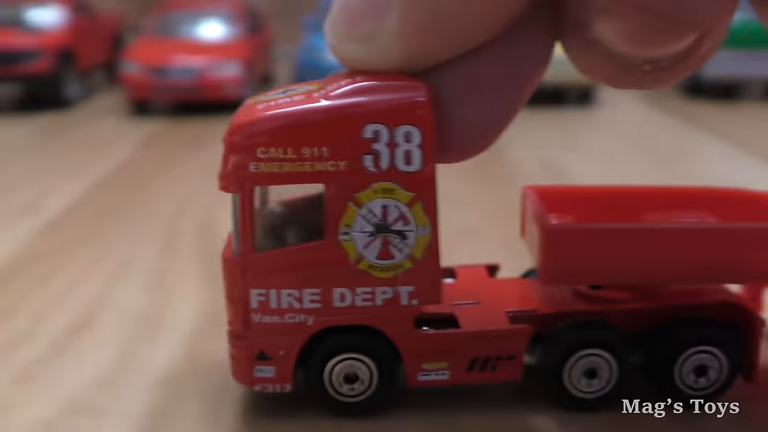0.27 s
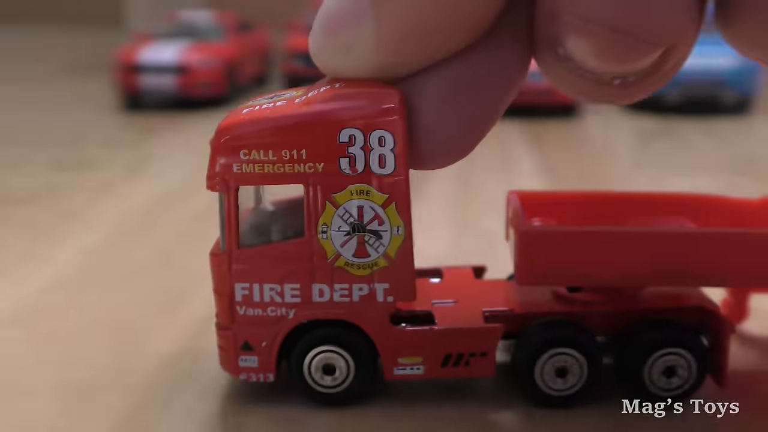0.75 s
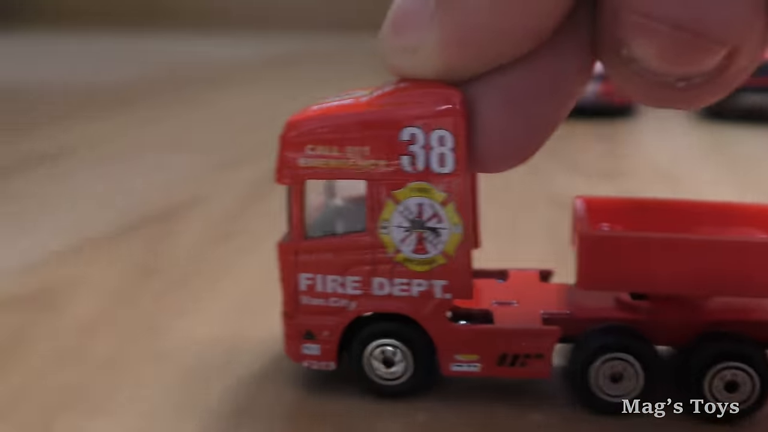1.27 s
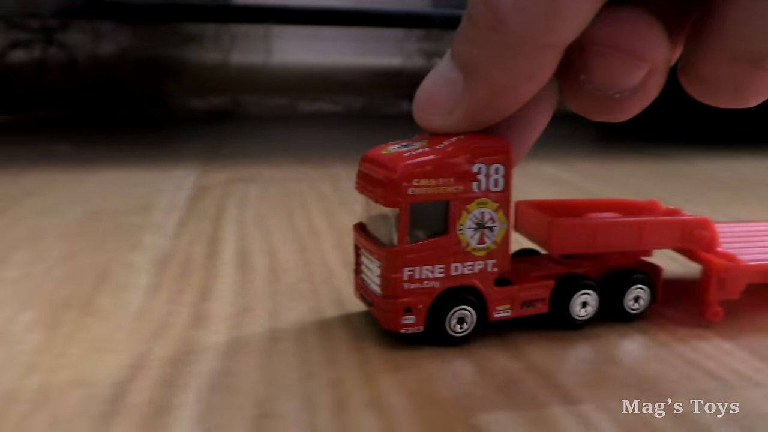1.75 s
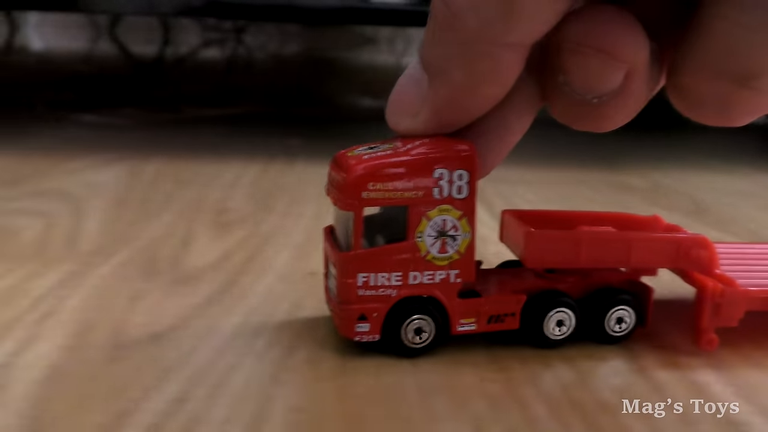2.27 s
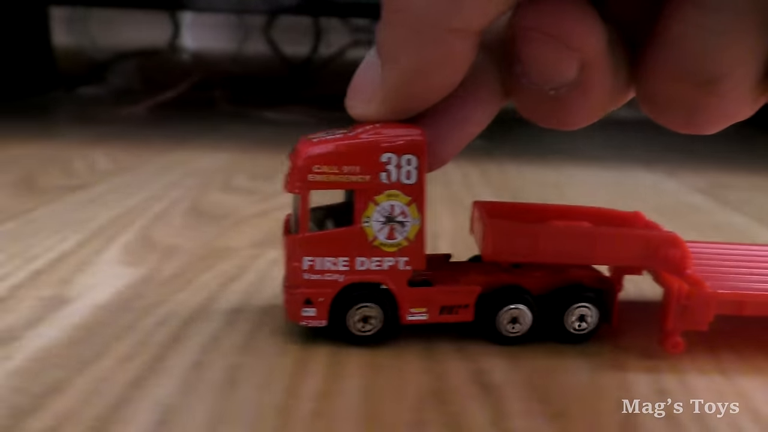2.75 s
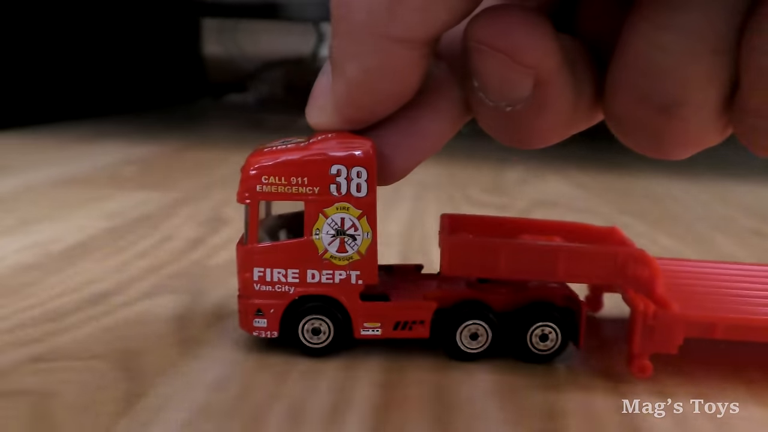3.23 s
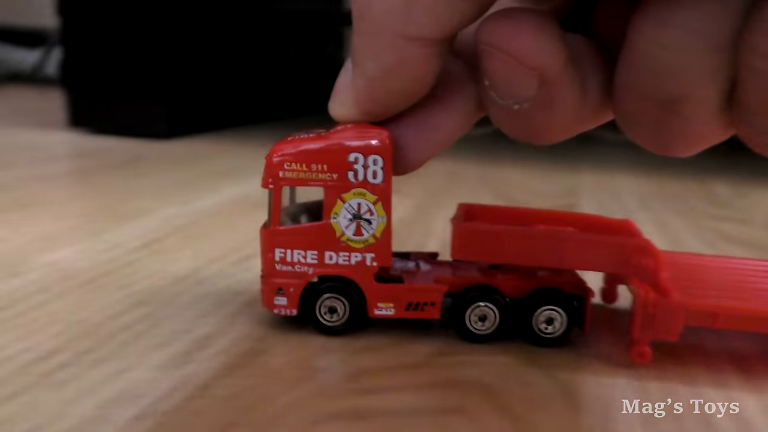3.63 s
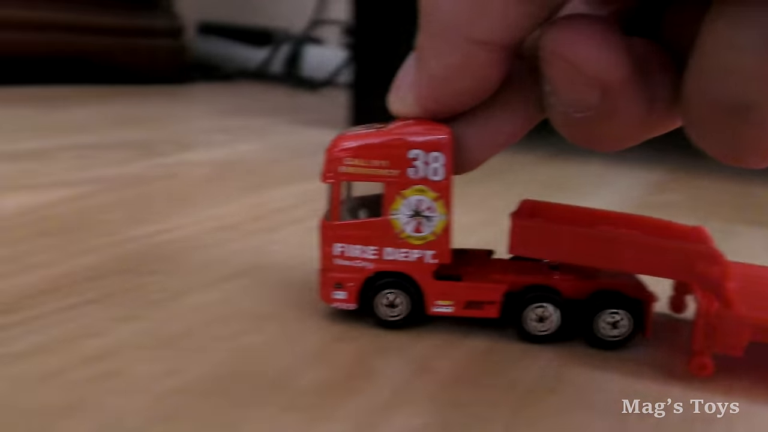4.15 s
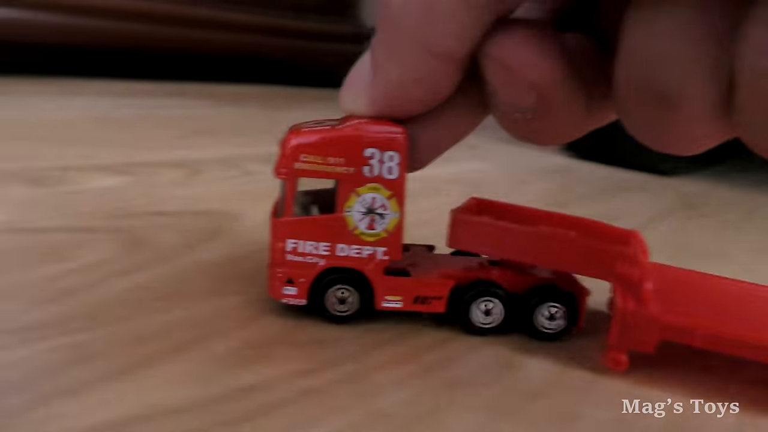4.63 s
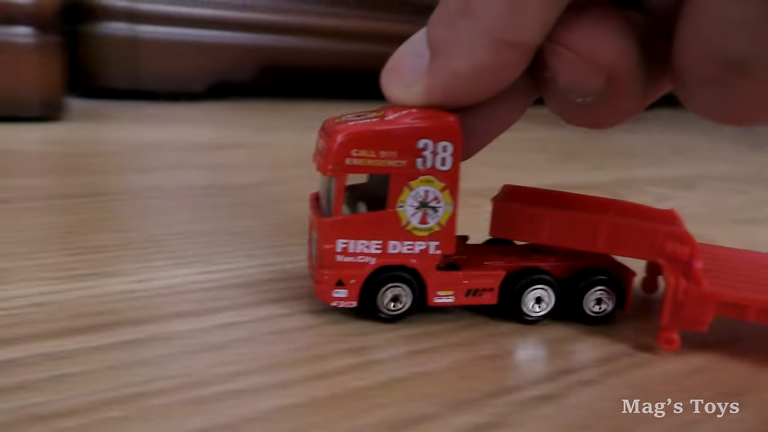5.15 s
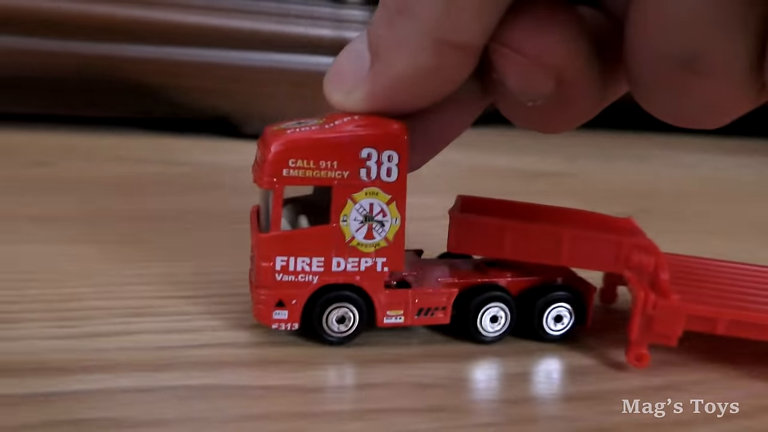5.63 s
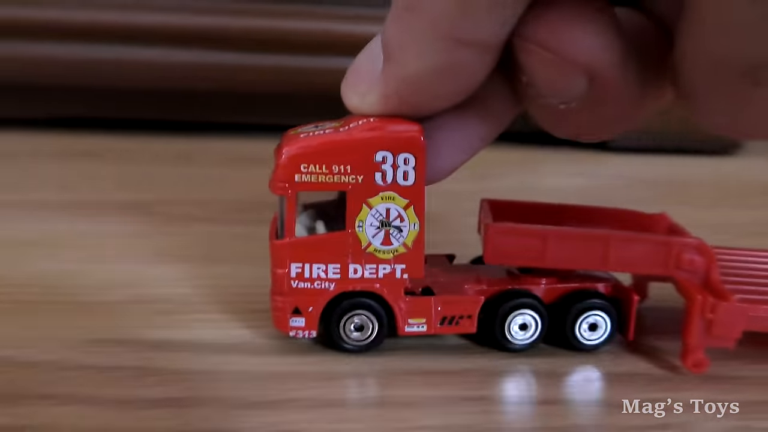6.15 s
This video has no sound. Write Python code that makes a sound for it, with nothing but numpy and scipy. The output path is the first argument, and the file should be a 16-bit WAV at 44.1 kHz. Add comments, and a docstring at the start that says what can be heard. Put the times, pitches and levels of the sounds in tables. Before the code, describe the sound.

From 0 s a small die-cast toy truck with a plastic trailer is already rolling over a wooden floor, close to a stereo microphone. A low, lumpy board rumble lies under a dry, gritty wheel grind. Loose axles rattle in brief irregular bursts, several each second, with sharp bright metallic-plastic clicks, each a tiny flurry of touches with a small wooden thump. From about 0.5 to 1.6 s the clicks are strong and crowded, peaking near 1.5 s. Around 1.6 s the tone changes as the truck seems slightly farther off. Snappy knocks continue near 2.2 s and 3 s; around 4 to 4.7 s some are lower and duller. From 5 to 6 s quick chatter and bright clicks return over surges of rumble. Rolling continues to the end at about 6.4 s, without stopping. Reflections are short, with only a faint low room hum behind.

```python
"""Toy truck on a wooden floor

A hand pushes a small die-cast toy truck with a plastic trailer, close to a two-port microphone.
The boards rumble under the wheels as filtered noise; the wheels grind over the grain and loose axles
rattle in bursts, both as random taps that ring the hollow body. Sharper knocks are flurries of touches
on the same body plus a low thump. Near echoes and a faint low room hum lie around them.
"""
import sys
import numpy as np
from scipy import signal
from scipy.fft import rfft, irfft, next_fast_len
from scipy.io import wavfile
from scipy.ndimage import uniform_filter1d

SR = 44100
rng = np.random.default_rng(int(sys.argv[2]) if len(sys.argv) > 2 else 0)


def dump(signal):
    """Clip the signal to [-1, 1] and save it as 16-bit WAV at the path in sys.argv[1]."""
    limited = np.clip(np.atleast_2d(signal).T, -1, 1)
    pcm = np.round(limited * 32767).astype(np.int16)
    wavfile.write(sys.argv[1], SR, pcm)


def gain_from_decibels(decibels):
    """Convert decibel values to linear amplitude factors."""
    exponent = np.asarray(decibels, float) / 20
    return 10 ** exponent


N = 281799

# All levels in the tables are relative: later stages add their own gain.
# Slow rolling levels: time_s, board_rumble_db, wheel_grind_db, axle_rattle_between_bursts_db
ROLLING_LEVELS = [(0, -34, -37.5, -44), (.09, -33, -34, -67), (.2, -31, -31, -42.5), (.4, -33, -30, -43),
                  (.6, -30, -32.5, -40.5), (1., -31, -28, -38), (1.5, -34.5, -32, -38.5),
                  (1.9, -34, -34.5, -50), (2.3, -33, -32.5, -39), (2.75, -33.5, -35, -40.5),
                  (3.3, -32.5, -34.5, -40.5), (3.7, -28.5, -31.5, -37.5), (4.0, -32.5, -31.5, -39),
                  (4.4, -30.5, -34.5, -40), (4.95, -33.5, -33.5, -44.5), (5.3, -27, -31.5, -36.5),
                  (5.65, -31, -32.5, -41.5), (5.85, -28, -31.5, -47), (5.97, -31, -29.5, -41),
                  (6.1, -28.5, -34, -37.5), (6.22, -32.5, -33, -41), (6.39, -32, -32, -41)]
# Sharper knocks of an axle in its slot: start_s, peak_db, favoured_pitch_hz, brightness_db_per_octave
AXLE_KNOCKS = [(0.0354, -12, 3170, 12), (0.1093, -12, 4070, -1), (0.118, -16, 3950, -1),
               (0.135, -17, 5830, 3), (0.1601, -12, 5650, 6), (0.1996, -6, 3800, 16),
               (0.3144, -6, 4000, 17), (0.3403, -10, 3960, 1), (0.3678, -13, 3700, 0.1),
               (0.387, -15, 3800, 0.1), (0.5, -9, 3700, 6), (0.516, -17, 4000, 5), (0.527, -10, 4000, 4),
               (0.5473, -5.5, 4070, 8), (0.5815, -9, 3640, 5), (0.6456, -8, 3800, -11),
               (0.698, -6, 3800, 0), (0.7154, -4.5, 3370, 12), (0.7405, -7.5, 3630, 13),
               (0.7978, -11, 3770, -2), (0.8544, -8, 3740, 8), (0.9267, -5.5, 3580, -5),
               (0.9682, -4.5, 4070, -19), (1.018, -9.5, 3990, -2), (1.054, -4, 3800, 16),
               (1.138, -17, 4200, 0), (1.1987, -3.5, 4240, 16), (1.271, -13, 3660, -12),
               (1.294, -24, 3290, 9), (1.3443, -25, 4020, 3), (1.365, -10, 3420, 1), (1.4564, -5, 3400, 16),
               (1.4675, -3.5, 3460, 20), (1.52, -18, 3500, 8), (1.5383, -1, 3300, 11), (1.558, -9, 3400, 8),
               (1.572, -16, 3500, 5), (1.613, -8, 8500, 0), (1.6501, -8, 3830, 22), (1.819, -16, 4100, 0.1),
               (1.83, -8.5, 4060, 9), (1.942, -11.5, 4200, -3), (2.006, -7, 4100, 1),
               (2.022, -14, 4000, 20), (2.1694, -10, 3370, -3), (2.195, -12, 4010, -6),
               (2.2147, -3, 3960, 0), (2.246, -9, 3300, -9), (2.276, -2.5, 3260, 17),
               (2.386, -8.5, 3740, 16), (2.4687, -14, 3990, 0.1), (2.531, -20, 3580, 3),
               (2.5825, -8, 3800, 12), (2.68, -13, 4200, 3), (2.7733, -7, 3700, 7), (2.9374, -13, 3230, -4),
               (2.98, -6, 3400, 19), (3.069, -6, 3830, 13), (3.1889, -14, 3470, 9), (3.3435, -14, 4060, 7),
               (3.3745, -11, 3420, 0), (3.4248, -9.5, 3550, -5), (3.434, -9, 2580, -8),
               (3.432, -5, 8900, 9), (3.5763, -12, 4020, 1), (3.623, -11, 3450, -4),
               (3.669, -6.5, 3350, 13.5), (3.738, -12, 3440, -6), (3.779, -11, 1850, -10),
               (3.869, -21, 8900, 2), (4.005, -6.5, 4700, 11), (4.019, -21, 3860, 11),
               (4.048, -23, 3240, 14), (4.073, -20, 3140, 10), (4.0826, -8, 3000, 15),
               (4.119, -17, 2650, -3), (4.164, -8, 3400, 12), (4.2492, -16, 3900, 24),
               (4.282, -12, 2520, 1), (4.3203, -14, 3990, 14), (4.4832, -12.5, 1820, 10),
               (4.569, -8, 2560, 9), (4.598, -5, 1860, 7), (4.628, -12, 2470, 12), (4.7681, -18, 2900, 8),
               (4.84, -13, 3400, 5), (4.9412, -9, 3550, 4), (5.03, -13, 2030, -7), (5.0954, -6, 3300, 18),
               (5.14, -13, 3320, -5), (5.259, -7, 3330, 21), (5.407, -5, 4160, 18), (5.431, -12, 3840, 2),
               (5.447, -7, 8900, 8), (5.5407, -18, 3820, 5), (5.642, -16, 2580, -2),
               (5.7413, -5.5, 3620, 16.5), (5.8184, -14, 2770, 1), (5.8977, -11, 3270, -4),
               (5.945, -9, 8900, 17), (6.027, -15, 1910, 12), (6.062, -6, 2580, 9),
               (6.1756, -8.5, 2020, -2), (6.1973, -21, 3900, 12), (6.353, -13, 3400, 12)]
# Spectrum of the floorboards: pitch_hz, density_db_per_hz
BOARD_SPECTRUM = [(65, -50), (110, -22.5), (145, -17.5), (165, -14.5), (190, -9), (231, -3), (340, 1.5),
                  (445, -3.5), (600, -22), (693, -19.5), (816, -26.5), (1000, -25), (1200, -25),
                  (1430, -20), (2420, -120)]
# Body and trailer resonances: pitch_hz, unloaded_t60_s, level_db,
# scatter_share (of the pitch scatter between contact points: low for the stiff metal parts)
BODY_MODES = [(1065, 0.01, -37, 1), (1310, 0.0091, -24, 1), (1520, 0.012, -27, .8), (1810, 0.019, -6, 0.73),
              (2005, 0.025, -4.5, 0.32), (2220, 0.025, -11, 1), (2580, 0.033, 3, 0.18),
              (2852, 0.025, 1, 0.84), (3290, 0.042, 5.5, 0.32), (3570, 0.011, 10.5, 0.92),
              (3952, 0.014, 10.5, 0.68), (4255, 0.013, 3, .8), (4670, 0.024, -2, 0.78),
              (5016, 0.047, 0.5, .15), (5167, 0.019, -0.5, .5), (5560, 0.015, 0.5, 0.87),
              (5800, 0.024, -5, .6), (6000, 0.038, -6.5, .7), (6500, 0.07, -12.5, 0.081),
              (6780, 0.02, -7.5, .7), (7670, 0.03, -10.5, 0.34), (8300, 0.021, -9.5, .6),
              (8873, 0.023, -4.5, .15), (9230, 0.012, -7.5, 0.61), (9700, 0.016, -11.5, 1),
              (10500, 0.015, -11, 1), (11080, 0.015, -19, 1), (12900, 0.022, -22, 1),
              (12640, 0.025, -16, 1), (14200, 0.008, -28, 1), (14700, .015, -26, .5), (15600, .01, -24, 1)]
# Tone of the wheel grind: pitch_hz, gain_db
GRIND_SPECTRUM = [(500, -10.5), (1000, -3), (2000, 3), (4000, -7), (6000, -11), (9000, -18), (15000, -26)]
# Tone of the axle rattle: pitch_hz, gain_db
RATTLE_SPECTRUM = [(700, -37), (1500, -1), (3000, -2), (5000, -2.5), (8000, 4.5), (12000, 3), (16000, -10)]
# Bursts of chatter when a wheel's uneven spot comes round: start_s, length_s, level_db
CHATTER_BURSTS = [(0.09, 0.015, -42), (0.107, 0.13, -36), (0.298, 0.086, -38), (0.413, 0.066, -48),
                  (0.481, 0.037, -32.5), (0.555, 0.04, -47), (0.677, 0.057, -39), (0.77, 0.044, -43),
                  (0.81, 0.041, -33.5), (0.96, 0.11, -32.5), (1.108, 0.1, -35), (1.268, 0.035, -47),
                  (1.334, 0.089, -33), (1.448, 0.17, -35), (1.642, 0.077, -35.5), (1.748, 0.041, -37.5),
                  (1.804, 0.017, -33.5), (1.863, 0.06, -59), (1.931, 0.015, -36.5), (2.001, 0.043, -38),
                  (2.062, 0.1, -51), (2.189, 0.14, -34), (2.387, 0.042, -31.5), (2.464, 0.03, -31.5),
                  (2.566, 0.044, -35), (2.638, 0.09, -33), (2.766, 0.051, -34), (2.833, 0.066, -36.5),
                  (2.945, 0.13, -33), (3.126, 0.059, -36), (3.175, 0.038, -33), (3.23, 0.042, -34),
                  (3.37, 0.02, -34), (3.443, 0.073, -33.5), (3.543, 0.16, -37), (3.997, 0.023, -36.5),
                  (4.07, 0.15, -39.5), (4.2, 0.021, -33.5), (4.24, 0.2, -46), (4.381, 0.063, -36.5),
                  (4.477, 0.017, -33.5), (4.583, 0.057, -39), (4.618, 0.052, -34), (4.692, 0.07, -45),
                  (4.775, 0.032, -33.5), (4.817, 0.017, -31), (4.885, 0.084, -52), (4.968, 0.027, -38),
                  (5.028, 0.013, -34.5), (5.075, 0.016, -41), (5.137, 0.15, -32), (5.348, 0.019, -32),
                  (5.41, 0.032, -36.5), (5.472, 0.026, -33), (5.519, 0.059, -32.5), (5.634, 0.023, -30.5),
                  (5.688, 0.036, -38.5), (5.717, 0.031, -30.5), (5.767, 0.026, -36), (5.823, 0.036, -32.5),
                  (5.882, 0.048, -31), (5.934, 0.034, -33.5), (6.034, 0.067, -36), (6.189, 0.07, -33.5),
                  (6.277, 0.042, -33.5), (6.31, 0.068, -43)]
# Brief dips of grind and rattle: centre_s, length_s (centre to 1/e of the dip in dB), depth_db
BRIEF_LULLS = [(1.98, 0.018, -3), (2.766, 0.0051, -9), (3.31, 0.0077, -10), (3.366, 0.011, -3.5),
               (3.502, 0.022, -5.5), (3.977, 0.014, -7), (4.039, 0.016, -6), (4.53, 0.036, -3),
               (4.745, 0.039, -4.5), (4.866, 0.015, -4), (5.012, 0.0086, -4), (5.876, 0.0069, -6),
               (5.968, 0.009, -8)]
# Level of each touch in a knock's flurry: level_db
BOUNCE_LEVELS_DB = [-1.5, 1, -4, -7.5, -5]
# Truck seen from the microphone, which is set farther back at 1.6 s: time_s, nearness (0-1), boom_db,
# scrape_db, rumble_top_edge_db, hiss_db, low_band_db, mid_band_db, left_minus_right_db
TRUCK_POSE = [(.1, 0.72, 6.5, 6, 3, 0.5, -2, -1, -1.2), (.5, 0.98, 1.5, 0, 1.5, -1, 0.5, -0.4, -0.9),
              (.9, 1, 4, -1, 2.5, -2.5, 0, -0.17, -0.7), (1.25, 1, 2.5, -1, 6.5, -2.5, -1.5, 0.93, -1.5),
              (1.6, 0.8, 3, -3, 4.5, 0, 1, 1.8, -2.5), (1.63, 0, 5, 2, 5.5, -1, 1, -1.5, -0.5),
              (2., 0.26, 3, 4.5, 2, 3, 1.5, -1.4, 0.7), (2.3, 0.02, -1, -2.5, 1, -3.5, -2.5, -0.78, -0.5),
              (2.65, 0.7, 2.5, -3, 1, -4, 2.5, -0.67, 0), (3., 0.25, 5, -3, -0.5, -1, -2.5, 0.93, 0),
              (3.3, 0.3, 4, -2.5, -1, -4.5, 0.5, 1.9, -0.2), (3.6, 0.45, 0, -1, -2, -2, -2.5, 1.9, -1),
              (3.95, 0.37, 1, 0, -2.5, -2, -2.5, 2.1, -0.8), (4.3, 0.23, 1.5, -2, -3, -2.5, -1, 1.8, -1.5),
              (4.7, 0, -0.5, -1, 1, -4, -1, 0.67, -1.5), (5.1, 0.3, -6, -5, 0.5, -1.5, -4.5, 1.1, -1.5),
              (5.35, 0.2, -6, -4, 0, -2.5, -4.5, 1.5, -1.5), (5.6, 0.32, -2.5, -4, 1.5, -2, -1.5, 2, -1),
              (5.95, 0.56, -1, -2, 4, 0.5, -2.5, 1.5, -0.5), (6.3, 0.5, 3.5, -4, 8, -2, 0, 0.5, -0.5)]
# Colour regions that change with nearness: centre_hz, width_log_hz, far_db, near_db
COLOUR_REGIONS = [(121, 0.57, 1, -2), (296, 0.2, -4, 1), (430, 0.12, 2.5, -3.5), (510, 0.071, 3, -4),
                  (618, 0.22, -2, 1.5), (780, 0.12, -1.5, 1), (920, 0.62, -1, -1.5), (1690, 0.23, 6, -0.5),
                  (2560, 0.11, 0.5, -5.5), (3800, 0.096, -1, 1), (7000, 0.059, 0, -1),
                  (8900, 0.03, -0.5, -2), (9350, 0.1, -0.5, 0.5), (12900, 0.38, 3.5, 1)]
# Strength of the passing patches of colour: pitch_hz, spread_db
PATCH_SPREAD = [(800, 0.35), (2000, 0.82), (3500, 1.12), (5000, 0.86), (9000, 1.9)]
# Share of power that both ports hear alike: pitch_hz, likeness (0-1)
PORT_LIKENESS = [(60, 0.16), (130, 0.97), (290, 1), (640, 0.88), (1000, 0.72), (1800, 0.8), (3500, 0.94),
                 (6820, 0.91), (10000, 1), (15000, 0.92)]
# Phase by which the left port leads: pitch_hz, lead_rad
PORT_LEAD = [(0, -0.14), (860, -0.2), (1460, 0.71), (1810, 0.036), (3010, -0.88), (3530, -0.69),
             (4050, -0.63), (5170, 0.52), (6370, -0.023), (11700, -0.14), (14400, -0.17), (14700, -0.6),
             (15900, -0.14)]
# Level difference between the ports: pitch_hz, left_minus_right_db
PORT_LEAN = [(60, 9), (110, 0.5), (200, 0.5), (380, -1.5), (700, -3), (1290, -4.5), (2380, -5),
             (4400, -4.5), (8120, 0), (15000, -5)]
# Spectrum of the room hum: pitch_hz, density_db_per_hz
ROOM_SPECTRUM = [(20, -16), (60, -2), (110, -9), (200, -5), (1000, -18)]


def rumble():
    """The boards answer the bumps of the grain with a broad low hump of noise, in random lumps."""
    lump_db, lump_s = 1, 0.033
    low = coloured(rng.standard_normal(N), BOARD_SPECTRUM)
    wander = evened(uniform_filter1d(rng.standard_normal(N), round(lump_s * SR)))
    return gain_from_decibels(lump_db * wander) * rolling(column=1) * low / band_rms(low, 150, 550)


def grind():
    """Dense small bumps under the wheels ring the lower body modes."""
    follow = 0.15  # dB of grind for each dB that a burst lifts the rattle
    burst_lift = 1 + bursts() / rolling(column=3) ** 2  # as a power ratio
    level = rolling(column=2) * burst_lift ** (follow / 2) * lulls()
    bumps = contacts(per_s=3400, size_db=2.25, jolts_per_s=130, jolt_db=-5.5, settle_s=0.004,
                     together=0.23, count=24, home_hz=(1500, 4200),
                     spread_db=5.5, crack_db=12, crack_s=0.014, favour_db=7.5, reach=0.32,
                     ring_share=0.58, scatter=0.032)
    sound = coloured(sounded(*bumps, level), GRIND_SPECTRUM)
    return gain_from_decibels(-3.0) * sound / band_rms(sound, 1140, 5600) * np.sqrt(np.mean(level ** 2))


def rattle():
    """Loose axles chatter in their slots, brighter and more jolted than the grind."""
    level = np.sqrt(rolling(column=3) ** 2 + bursts()) * lulls()
    ticks = contacts(per_s=2200, size_db=1.16, jolts_per_s=70, jolt_db=3.5, settle_s=0.0026,
                     together=0.17, count=24, home_hz=(5000, 14500),
                     spread_db=6.5, crack_db=-1.5, crack_s=0.02, favour_db=11, reach=0.16,
                     ring_share=0.74, scatter=0.02)
    sound = coloured(sounded(*ticks, level), RATTLE_SPECTRUM)
    return gain_from_decibels(-2.0) * sound / band_rms(sound, 5730, 16000) * np.sqrt(np.mean(level ** 2))


def knocks():
    """Short flurries of touches ring the whole body, leaning slightly right by varying amounts."""
    far_lean_db, near_lean_db, lean_scatter_db = -1, -2, -0.5  # left minus right
    out = np.zeros((2, N + 4096))
    times, near, *_ = np.transpose(TRUCK_POSE)
    for start_s, peak_db, favour_hz, bright_db in AXLE_KNOCKS:
        touches = flurry(favour_hz, bright_db)
        lean_db = np.interp(np.interp(start_s, times, near), [0, 1], (far_lean_db, near_lean_db))
        lean_db = lean_db + lean_scatter_db * rng.standard_normal()
        side = gain_from_decibels(np.array([[.5], [-.5]]) * lean_db)
        knock = touches / abs(touches).max() + board_thump(len(touches))
        start = round(start_s * SR)
        out[:, start:start + len(knock)] += gain_from_decibels(peak_db - 10.0) * side * knock
    return out[:, :N]


def flurry(favour_hz, bright_db):
    """A knock is a quick run of touches, each ringing the body from a new contact point."""
    touches = np.zeros(3072)
    times = np.cumsum(rng.uniform(0.0008, 0.0033, len(BOUNCE_LEVELS_DB)))  # gaps in s
    starts = ((times - times[0]) * SR).astype(int)
    for start, bounce_db in zip(starts, BOUNCE_LEVELS_DB):
        touch = ring(spread_db=5.0, crack_db=-1.0, crack_s=0.0077, bright_db=bright_db,
                     favour_hz=favour_hz, favour_db=14.5, reach=0.11, ring_share=0.56, scatter=0.018)
        onset = np.minimum(np.arange(len(touch)) / (0.00019 * SR), 1)
        touches[start:start + len(touch)] += gain_from_decibels(bounce_db) * touch * onset
    return touches


def board_thump(length):
    """A knock also jolts the board under the wheel: a short decaying sine of varying pitch."""
    centre_hz, t60_s, level_db = 311, 0.05, -10.5
    t = np.arange(length) / SR
    envelope = gain_from_decibels(level_db - 60 * t / t60_s) * np.minimum(t * centre_hz, 1)
    return envelope * np.sin(2 * np.pi * centre_hz * rng.uniform(0.72, 1.37) * t)


def bursts():
    """Power of the chatter: each burst rises quickly, sags while it lasts and dies fast."""
    rise_s, sag_db, tail_db_per_s = 0.015, -1.5, -400
    t, power = np.arange(N) / SR, np.zeros(N)
    for start_s, length_s, level_db in CHATTER_BURSTS:
        start = round(start_s * SR)
        since = t[start:][:SR // 2] - start_s
        sag = sag_db * np.minimum(since / length_s, 1)
        tail = tail_db_per_s * np.maximum(since - length_s, 0)
        rise = np.clip(since / rise_s, 0, 1)
        power[start:][:SR // 2] += (rise * gain_from_decibels(level_db + sag + tail)) ** 2
    return power


def lulls():
    """Gain with a smooth dip at each lull."""
    t = np.arange(N) / SR
    return gain_from_decibels(sum(db * np.exp(-((t - s) / length) ** 2) for s, length, db in BRIEF_LULLS))


def contacts(per_s, size_db, jolts_per_s, jolt_db, settle_s, together, count, home_hz, **tone):
    """Random taps at several contact points; jolts set them off at once and they settle, partly alone."""
    groups = 6
    strengths = np.minimum(rng.exponential(1, (groups + 1, N)), 2.2)
    jolts = strengths * (rng.random((groups + 1, N)) < jolts_per_s / SR)
    jolts[0] *= .6  # row 0 is common to all groups
    knock_starts = np.round(np.array(AXLE_KNOCKS)[:, 0] * SR).astype(int)
    jolts[:, knock_starts] += .7  # every knock shakes all the loose parts
    shaken = evened(signal.lfilter([1], [1, -np.exp(-1 / (settle_s * SR))], jolts))
    shaken = together * shaken[0] + (1 - together) * shaken[1:]
    point = rng.integers(0, count, N)
    here = point % groups, np.arange(N)
    busy = gain_from_decibels(jolt_db) * np.minimum(shaken[here], 2.2) + 1
    wander = evened(uniform_filter1d(rng.standard_normal((groups, N)), round(.15 * SR)))
    drift_db = 1.7 * np.tanh(wander)  # parts take turns
    busy = busy * gain_from_decibels(drift_db[here])
    sizes = gain_from_decibels(size_db * np.minimum(rng.exponential(1, N), 3)) * busy
    taps = sizes * rng.choice([-1., 1.], N) * (rng.random(N) < per_s / SR)
    homes = np.geomspace(*home_hz, groups)  # each group of parts favours its own modes
    return taps, point, [ring(favour_hz=homes[k % groups], **tone) for k in range(count)]


def sounded(taps, point, rings, level):
    """Each tap rings its contact point at the rolling level, from that point's own place left or right."""
    lean_db, lag_s = 2, .000009  # spread between the ports
    hz = np.fft.rfftfreq(2048, 1 / SR)
    out = 0
    for k, body_ring in enumerate(rings):
        half = rng.standard_normal() * np.array([[.5], [-.5]])
        placing = gain_from_decibels(lean_db * half) * np.exp(2j * np.pi * hz * lag_s * half)
        placed = irfft(rfft(np.roll(body_ring, 8)) * placing, 2048)
        own_taps = taps * level * (point == k)
        out = out + signal.oaconvolve(own_taps[None], placed, axes=1)[:, :N]
    return out


def ring(spread_db, crack_db, crack_s, bright_db=0, favour_hz=4000, favour_db=0, reach=0.12,
         ring_share=1, scatter=0.029):
    """One contact point: it excites each body mode by its own amount, along with a short crack."""
    t = np.arange(2048) / SR
    hz, t60, db, loose = np.transpose(BODY_MODES)[:, :, None]
    t60 = t60 * ring_share  # a loaded wheel or a gripped part rings shorter
    share, detune, phase = rng.standard_normal((3, len(BODY_MODES), 1))

    def favour(pitch_hz):  # lift of the modes near the favoured pitch
        return favour_db * np.exp(-(np.log(pitch_hz / favour_hz) / reach) ** 2)

    # brightness tilts the modes about 4000 Hz, with no further change above 9400 Hz
    db = db + spread_db * share + bright_db * np.log2(np.minimum(hz, 9400) / 4000) + favour(hz)
    swing = np.sin(2 * np.pi * hz * (1 + scatter * loose * detune) * t + 1.34 * phase)
    modes = gain_from_decibels(db - 60 * t / t60) * swing / np.sqrt(t60 / 0.011)
    crack = np.diff(rng.standard_normal(len(t) + 1)) * gain_from_decibels(crack_db + bright_db - 60 * t / crack_s)
    crack_hz = np.fft.rfftfreq(len(t), 1 / SR) + 1
    crack = irfft(rfft(crack) * gain_from_decibels(favour(crack_hz)), len(t))
    return modes.sum(0) + crack


def rolling(column):
    """One column of the rolling table as a gain for every sample."""
    rows = np.array(ROLLING_LEVELS)
    return gain_from_decibels(np.interp(np.arange(N) / SR, rows[:, 0], rows[:, column]))


def evened(x):
    """Scales a signal to an rms of 1."""
    return x / np.sqrt(np.mean(x ** 2) + 1e-20)


def read(points, hz):
    """Reads a spectrum table at any pitch, interpolating along log frequency."""
    f, value = np.transpose(points)
    return np.interp(np.log(hz + 1), np.log(f + 1), value)


def coloured(x, points):
    """Filters a long signal by a spectrum."""
    size = next_fast_len(N)
    return irfft(rfft(x, size) * gain_from_decibels(read(points, np.fft.rfftfreq(size, 1 / SR))), size)[..., :N]


def band_rms(x, lo_hz, hi_hz):
    """Level of one band of a long signal."""
    power = np.atleast_2d(abs(rfft(x)) ** 2).mean(0)
    return np.sqrt(2 * power[round(lo_hz * N / SR):round(hi_hz * N / SR)].sum()) / N


def posed(x):
    """The slow colour change of a moving source, and quicker patches as its loose parts shift."""
    hz, t, z = signal.stft(x, SR, nperseg=1024)
    times, *columns = np.transpose(TRUCK_POSE)
    near, boom_db, scrape_db, top_db, hiss_db, low_db, mid_db, lean_db = (
        np.interp(t, times, column) for column in columns)

    def bell(centre_hz, width):
        return np.exp(-(np.log((hz + 1) / centre_hz) / width) ** 2)[:, None]

    field_db = sum(bell(centre_hz, width) * (far_db + (near_db - far_db) * near)
                   for centre_hz, width, far_db, near_db in COLOUR_REGIONS)
    field_db = field_db + bell(212, 0.49) * boom_db + bell(5980, 0.2) * scrape_db
    field_db = field_db + bell(574, 0.27) * top_db + bell(13800, 0.55) * hiss_db
    field_db = field_db + bell(1500, 0.18) * low_db + bell(2660, 0.14) * mid_db
    field_db = field_db + read(PATCH_SPREAD, hz)[:, None] * colour_patches(hz, t)
    field_db = field_db + np.array([.5, -.5])[:, None, None] * lean_db
    return signal.istft(z * gain_from_decibels(field_db), SR, nperseg=1024)[1][:, :N]


def colour_patches(hz, t):
    """Random field over pitch and time, smoothed into patches and scaled to an rms of 1."""
    smooth_s, smooth_hz = .07, 1480
    patches = rng.standard_normal((len(t), len(hz))).T
    patches = uniform_filter1d(patches, round(smooth_s / t[1]), 1)
    for _ in range(2):  # two passes of half the width
        patches = uniform_filter1d(patches, round(smooth_hz / hz[1] / 2), 0)
    return evened(patches)


def reflections(x, t60, turn_s, count):
    """Near echoes off floor and hand, different on each side; they change as the truck travels."""
    tails = rng.standard_normal((count, 2, 4096)) * gain_from_decibels(-60 * np.arange(4096) / SR / t60)
    tails /= np.linalg.norm(tails, axis=2, keepdims=True)
    place, out = np.arange(N) / SR / turn_s, 0
    for k, tail in enumerate(tails):
        away = (place - k + count / 2) % count - count / 2  # the tails crossfade in a circle
        fade = np.cos(np.pi / 2 * np.clip(away, -1, 1))
        out = out + signal.oaconvolve(x * fade, tail, axes=1)[:, :N]
    return out


def room():
    """A faint steady low hum of the room: filtered noise, independent at each port."""
    return gain_from_decibels(-50) * evened(coloured(rng.standard_normal((2, N)), ROOM_SPECTRUM))


def scene():
    """All the truck's sounds pass through the same changing colour and balance."""
    return posed(rumble() + grind() + rattle() + knocks())


def top_cut(x):
    """Nothing passes above the cut-off."""
    return signal.sosfilt(signal.butter(12, 16330, fs=SR, output="sos"), x)


def record(dry):
    """Two ports hear the truck with phase and level offsets, plus echoes and room hum, below a band limit."""
    edge_hz = 15800
    size = next_fast_len(N)
    hz = np.fft.rfftfreq(size, 1 / SR)
    same = np.clip(read(PORT_LIKENESS, hz), 0, 1)
    turn = np.exp(.5j * read(PORT_LEAD, hz)) * gain_from_decibels(read(PORT_LEAN, hz) / 2)
    echoes = reflections(dry, t60=0.1, turn_s=.09, count=12)
    heard = np.sqrt(same) * rfft(dry, size) + np.sqrt(1 - same) * rfft(echoes, size)
    heard = heard * np.array([turn, 1 / turn]) + rfft(room(), size)
    heard = heard / (1 + (hz / edge_hz) ** 400)  # a very steep edge
    mix = irfft(heard, size)[:, :N]
    return top_cut(mix)


dry = scene()
out = record(dry)
dump(out)
```